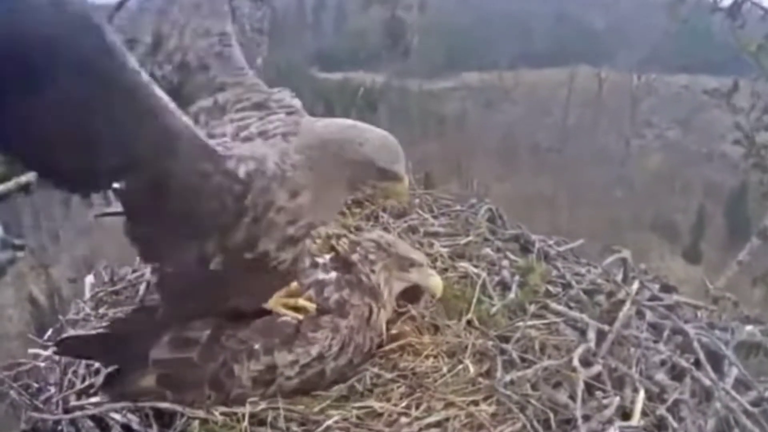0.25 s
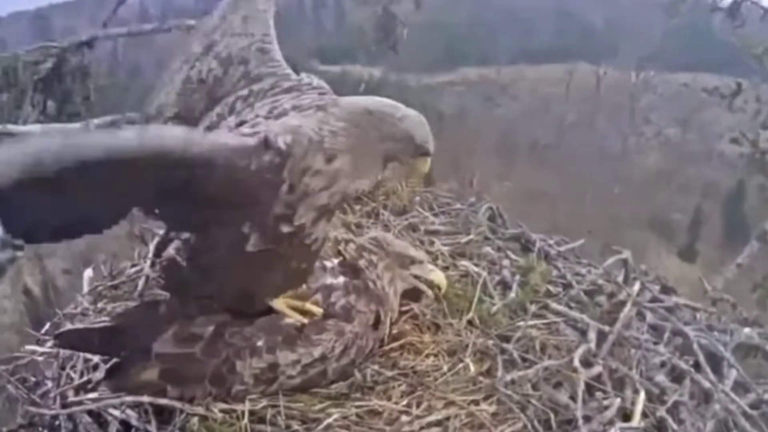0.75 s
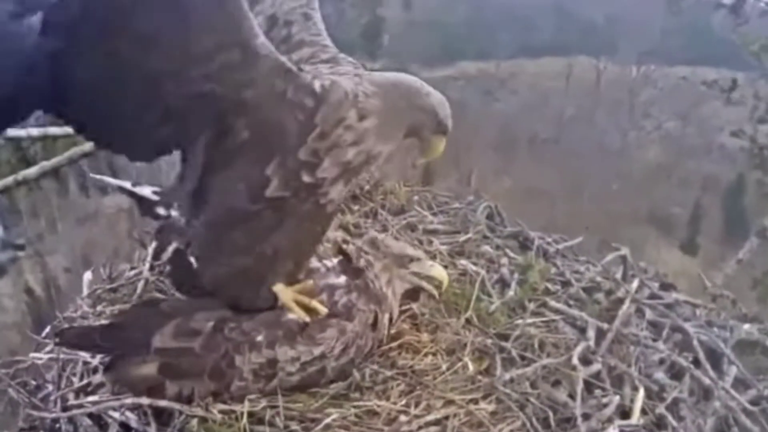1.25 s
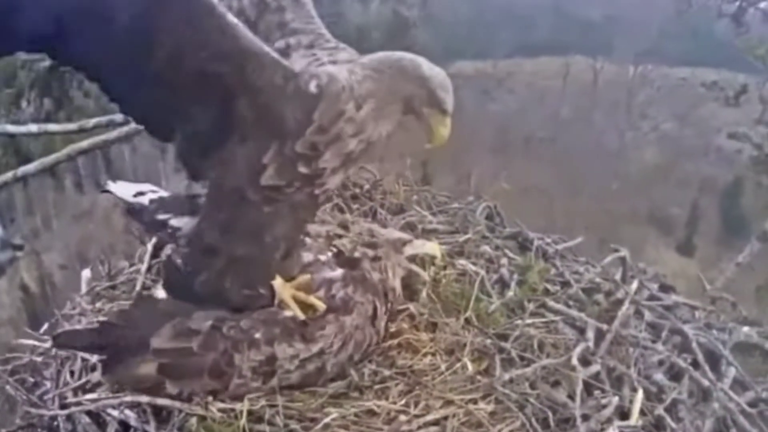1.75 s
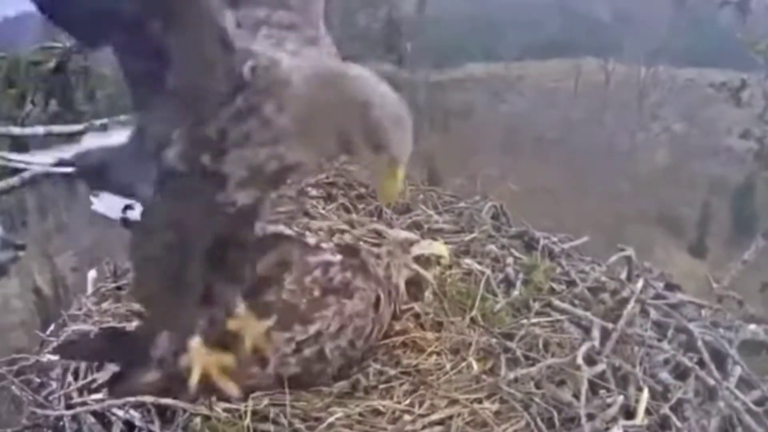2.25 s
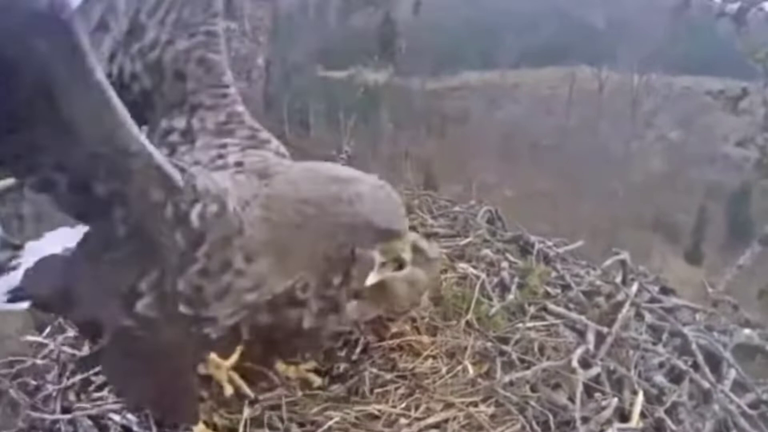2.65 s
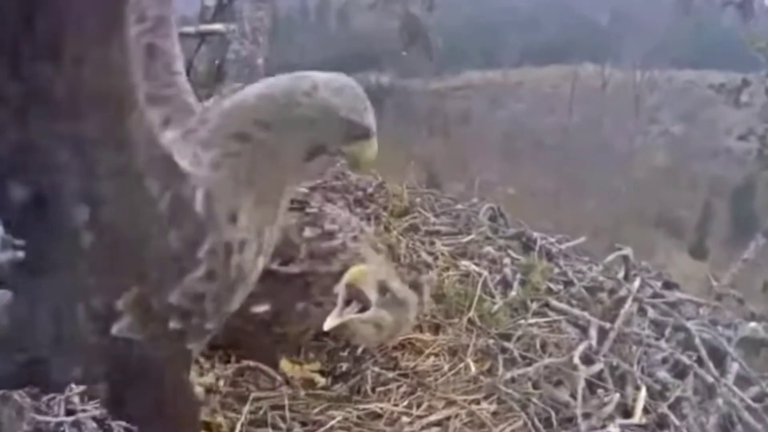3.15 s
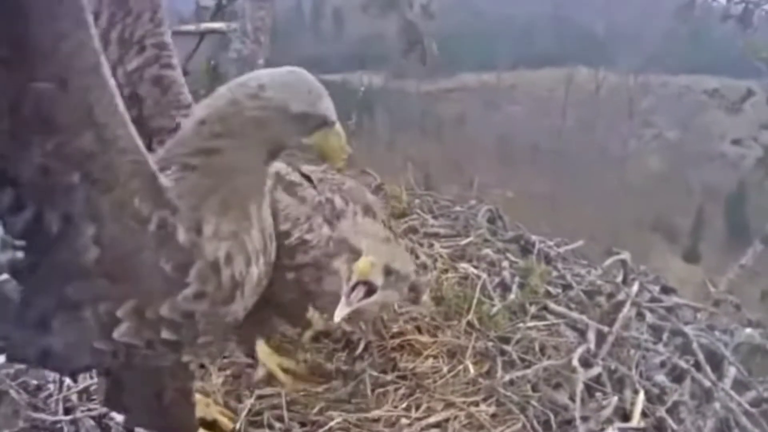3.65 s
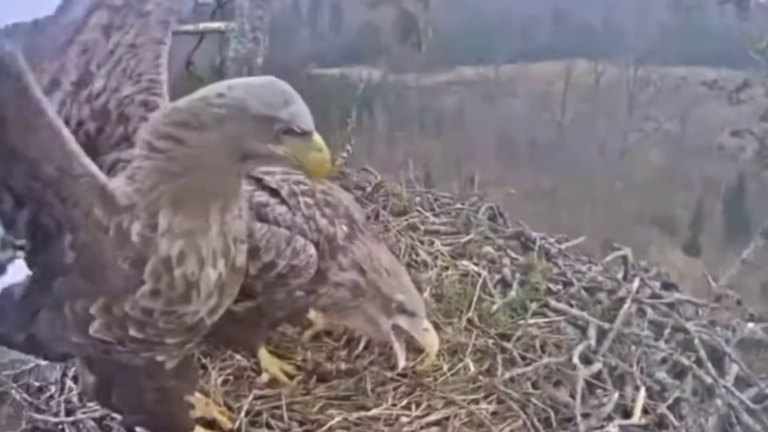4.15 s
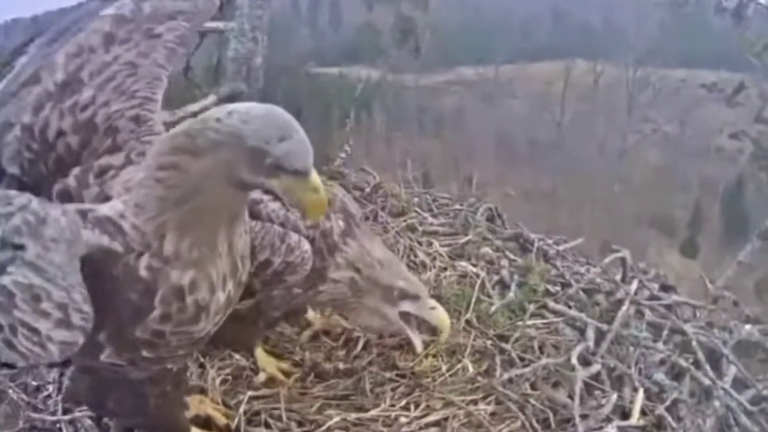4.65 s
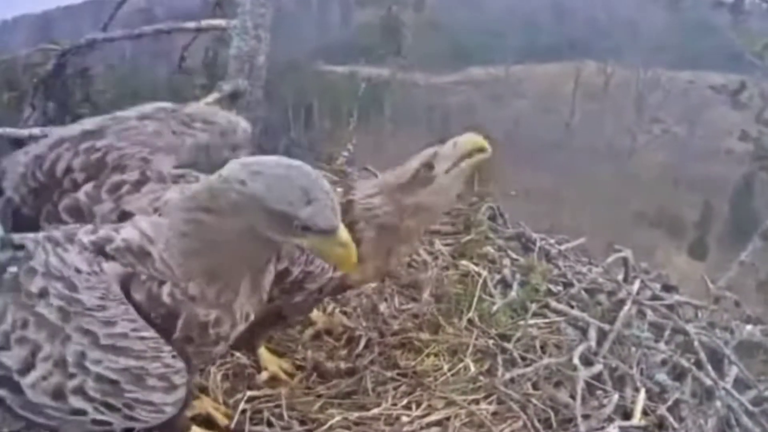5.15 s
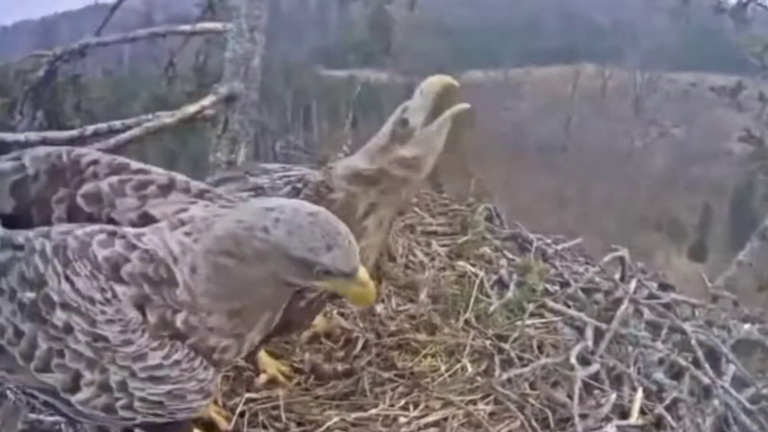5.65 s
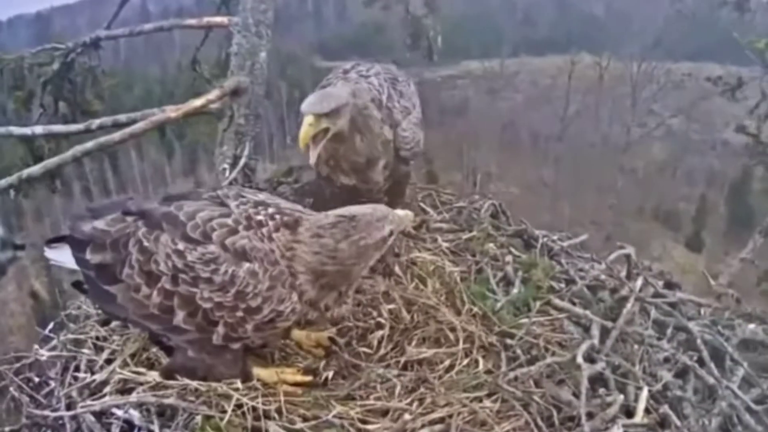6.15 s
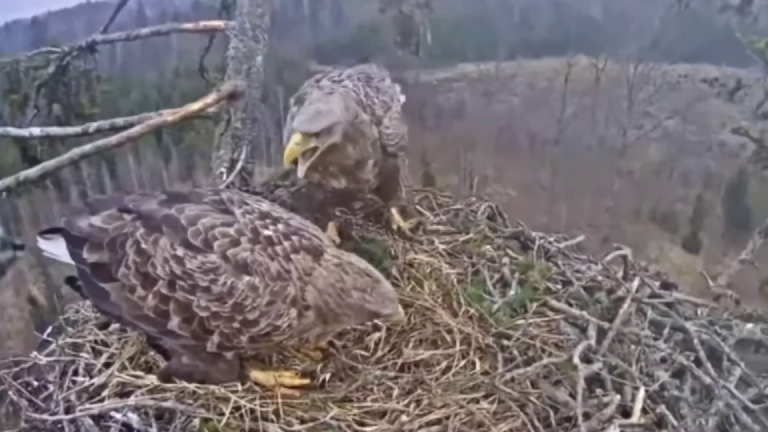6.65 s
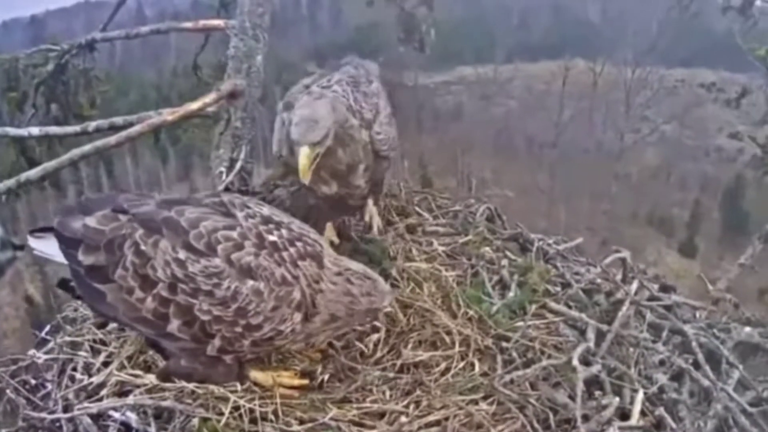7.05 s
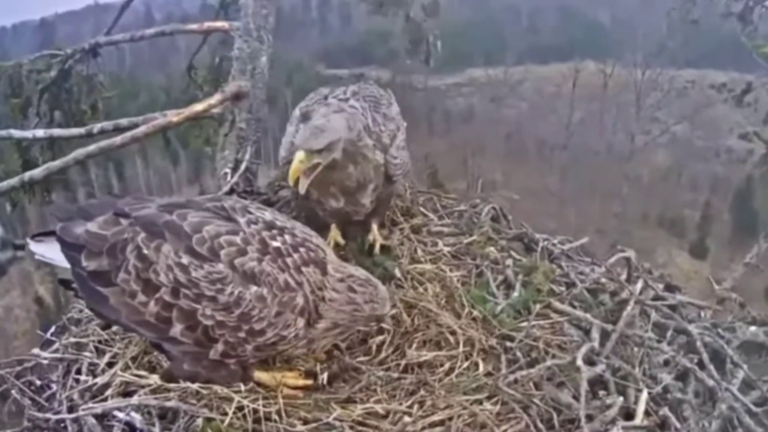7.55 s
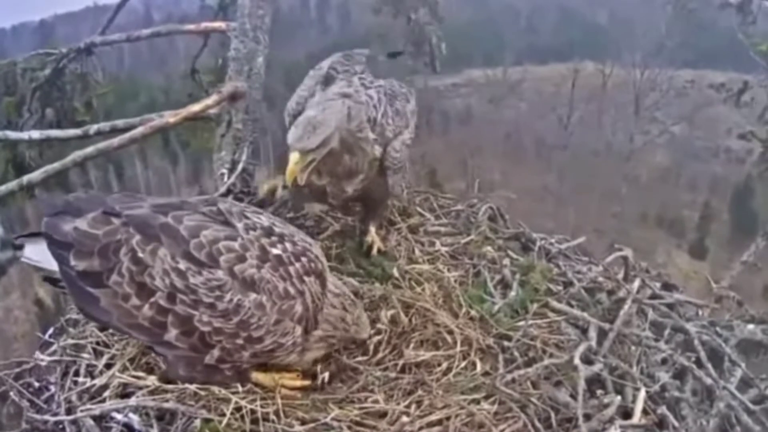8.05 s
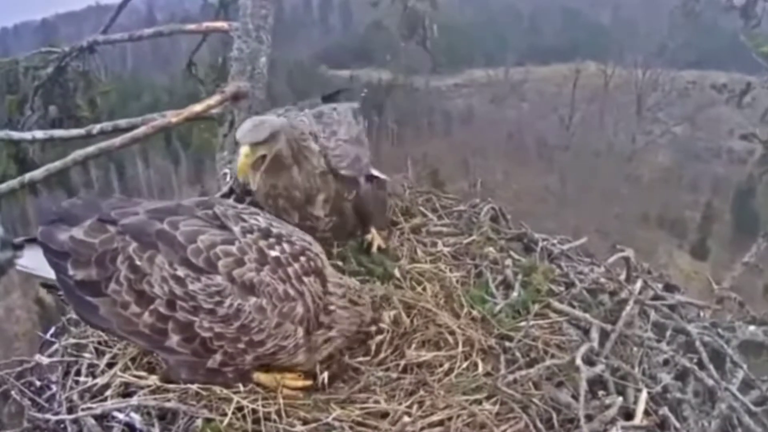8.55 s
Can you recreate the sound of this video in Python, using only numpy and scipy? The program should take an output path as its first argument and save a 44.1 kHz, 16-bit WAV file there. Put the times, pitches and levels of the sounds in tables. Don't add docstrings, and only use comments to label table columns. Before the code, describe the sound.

An eagle calls close to a microphone in an open treetop nest, with uneven low wind rumble throughout, strongest at the very start, and a faint forest hiss. A twig crackles at 0 s. From 0.7 to 2.7 s come soft, shaky whistles, some brief, some bulging or climbing. At 2.9 and 3.7 s whistles break into a higher voice; louder shouts follow at 4.1, with a twig snap, and 4.4. A short bark at 4.7 and a loud hoarse croak at 5.0 lead to raspy air, thin squeaks, clucks, settling sticks and a wing swish around 5.2-5.8. Sharp cries at 5.9 and 6.2 begin a regular run of loud, rising, cracking yelps from 6.5 to 8.7, about 0.3 s apart, with ragged tails and a slight outdoor echo. Feathers swish near 7.4; twigs snap at 8.1 and 8.4.

```python
import sys
import numpy as np
from scipy import signal
from scipy.fft import rfft, irfft, next_fast_len
from scipy.io import wavfile
from scipy.ndimage import uniform_filter1d, minimum_filter1d

SR = 44100
rng = np.random.default_rng(int(sys.argv[2]) if len(sys.argv) > 2 else 0)


def dump_mix(stems):
    frames = np.atleast_2d(stems).T
    limited = np.clip(frames, -1, 1)
    pcm = np.round(limited * 32767).astype(np.int16)
    wavfile.write(sys.argv[1], SR, pcm)


def linear_from_db(decibels):
    return 10 ** (np.asarray(decibels, float) / 20)


N = 387198
TIME = np.arange(N) / SR
SHORT_STEPS, STRIDE = 400, 16

# start_s, level_db, decay_s
SNAPS = [
    (0, -59, 0.0058),
    (.981, -60, 0.0018),
    (3.499, -72, 0.0027),
    (4.124, -46, 0.0066),
    (8.121, -49, 0.0021),
    (8.387, -54, 0.0015),
]
# peak_s, rumble_db, rise_s per 20 dB, fall_s per 20 dB, flutter_over_rumble_db
GUSTS = [(0.05, -29, .15, .12, -3), (.33, -43, .3, .4, -4), (0.66, -42, .2, .4, -11),
         (1.42, -35, .5, .4, -11), (2.0, -41, .5, .8, -7), (2.45, -48, .4, .6, -8), (3.05, -51, .5, .5, -6),
         (3.49, -46, .1, .1, -11), (3.78, -58, .15, .3, -6), (4.08, -49, .15, .3, -5),
         (4.5, -53, .2, .12, -15), (4.76, -41, .04, .5, -5), (4.99, -36, .4, .13, -9),
         (5.6, -46, .4, .2, -12), (5.82, -36, .06, .8, -3), (6.1, -37, .3, .8, -4), (6.6, -44, .5, .5, -5),
         (5.42, -56, .05, .15, 3), (6.95, -48, .3, .12, -5), (7.57, -43, .25, .12, -11),
         (7.85, -47, .3, .3, -8), (8.3, -48, .3, .4, -10), (8.62, -44, .4, .4, -4)]
CALM_DB = -60
# time_s, level_db
FOREST_LEVEL = [(0.0, -67.5), (0.8, -68.5), (1.0, -70), (2.47, -70.5), (2.9, -74.5), (3.5, -72.5),
                (5.26, -73.5), (5.72, -58), (7.06, -72.5), (7.43, -66.5), (7.61, -77), (8.78, -75)]
# pitch_hz, level_db
FOREST_COLOUR = [(350, -2.5), (650, -7.5), (800, 8), (1300, 0), (1700, 6), (2500, -1), (3600, -12.5),
                 (4800, -20), (6500, -42)]
HISS_DB = -86.5

# pitch_hz, level_db
THROAT = [(3000, 0), (3800, -6), (4600, -21), (5500, -32), (7000, -37), (9000, -52)]
# pitch_hz, level_db
SHRILL = [(4000, -27), (5700, -10.5), (6800, -6), (8000, -14), (10000, -23), (13500, -23.5), (15000, -39)]
# pitch_hz, level_db
MOUTH = [(800, 0.5), (1450, 0.5), (1850, 3.5), (2100, 12), (2500, 11), (2820, -10), (3500, -8), (4400, -20)]
RAISED_S, GAPE = 5.8, 1.09
WAVER_DB = 2.0
SHRILL_BELOW_HZ = 1400

# time_s, pitch_hz
WANDER = [
    [(0.738, 900), (0.771, 965), (0.789, 885), (0.804, 955), (0.84, 950), (0.865, 900), (0.96, 910)],
    [(1.598, 900), (1.64, 905), (1.70, 962), (1.745, 935), (1.785, 960), (1.82, 950)],
    [(2.002, 920), (2.08, 928), (2.128, 984), (2.17, 950), (2.22, 980), (2.248, 975)],
    [(2.418, 950), (2.53, 990), (2.575, 1030), (2.61, 1120), (2.65, 1160), (2.7, 1160)],
    [(2.905, 1035), (3.094, 1035), (3.133, 1094), (3.166, 1071), (3.241, 1130)],
]
WANDER_DB = [-53, -53, -53, -53, -52.5]
# start_s, length_s, taut_pitch_hz, last_pitch_hz, level_db
ARCHES = [
    (1.144, 0.14, 895, 938, -54.5),
    (1.326, 0.082, 955, 995, -51),
]
# start_s, length_s, taut_pitch_hz, last_pitch_hz, level_db
SHOUTS = [
    (4.108, 0.159, 1150, 1210, -48),
    (4.419, 0.099, 1230, 1260, -47),
]
# start_s, length_s, taut_pitch_hz, last_pitch_hz, level_db
CLIMBS = [
    (3.672, 0.195, 1126, 1158, -47),
]
# start_s, length_s, taut_pitch_hz, last_pitch_hz, level_db
BARKS = [
    (4.712, 0.0402, 1148, 1152, -48.5),
]
# start_s, length_s, taut_pitch_hz, last_pitch_hz, level_db
UPPERS = [
    (3.242, 0.226, 1448, 1478, -49.5),
    (3.866, 0.066, 1488, 1488, -46),
    (4.75, 0.018, 1335, 1317, -44),
]
# start_s, length_s, taut_pitch_hz, last_pitch_hz, level_db
CROAKS = [
    (5.008, 0.022, 1250, 1250, -27),
]
# start_s, length_s, taut_pitch_hz, last_pitch_hz, level_db
CRIES = [
    (5.88, 0.062, 1330, 1320, -36.5),
    (6.182, 0.06, 1390, 1420, -39.5),
]
# start_s, length_s, level_db
DOUBLING = [(0.82, 0.14, -70), (1.165, 0.115, -67.5), (2.425, 0.09, -66), (2.5, 0.2, -75), (2.93, .2, -79),
            (3.345, 0.06, -82), (4.694, 0.036, -54.5)]
# peak_s, shrill_db, rise_s per 20 dB, fall_s per 20 dB
STRAIN = [
    (3.715, -31, .022, .16),
    (4.143, -40, 0.0036, .019),
    (4.476, -68, 0.039, .027),
    (4.754, -36, .013, 0.012),
    (5.018, -41, .01, 0.0045),
]

# slack start hz, tighten s, slack end hz, let go s
ARCH, SHOUT, CLIMB = (820, .012, 830, .01), (900, .018, 800, .022), (900, .015, 1180, .002)
UPPER, CRY = (1440, .002, 1320, .012), (1140, .017, 1230, .013)
# second and third harmonic over the mouth's colour db; loss of first, second, third when slack db
SOFT, STRONG, FALSETTO = (-2.5, -4, 8, 20, 34), (2, -4, 10, 3, 24), (-1, 2, 10, 12, 12)
YELPED, HOARSE, OPEN = (-5, -3, 12, 10, 14), (-25, -35, 25, 5, 5), (-1, 9, 10, -2, 26)
PUSHED = (-4, 1.5, 7, 5, 25)

# start_s, length_s, level_db
RASPS = [(2.89, 0.017, -59), (3.66, 0.038, -58), (4.101, 0.027, -49.5), (4.709, 0.032, -41.5),
         (4.78, 0.02, -52), (5, 0.028, -38.5), (5.042, 0.03, -53.5), (5.068, 0.031, -47),
         (5.264, 0.025, -45.5), (5.367, 0.015, -46), (5.657, 0.023, -54.5), (5.387, 0.0447, -52),
         (7.89, 0.02, -61)]
# pitch_hz, level_db
RASP_COLOUR = [(800, -13), (1250, 2.5), (1900, 1), (2500, -2), (3500, -16), (4500, -28.5)]

# start_s, length_s, pitch_hz, level_db
DROPS = [
    (3.464, 0.013, 975, -56.5),
    (3.929, 0.013, 1070, -52),
]
DROP_HZ, DROP_SECOND_DB = 785, 15.5
# start_s, rise_length_s, length_after_break_s, level_db
YELPS = [(6.466, .035, 0.024, -32.5), (6.741, 0.029, .034, -31), (7.02, 0.023, .041, -31),
         (7.281, .03, 0.038, -30.5), (7.542, .025, .019, -31.5), (7.82, .017, 0.026, -29.5),
         (8.114, .018, 0.0377, -31), (8.386, .025, 0.033, -32), (8.642, 0.019, 0.038, -33)]
# start hz, end hz, first and second harmonic over the yelp's level db
RISE, BREAK = (1199.5, 1470.5, -9.5, -2), (1759.5, 1659.5, 0.5, -9.5)
BREAK_GAP_S = .001
# start_s, length_s, pitch_hz, first_harmonic_db, second_harmonic_db
SCRAPS = [(4.767, .0086, 1840, -39, -61), (4.782, .011, 1410, -49.5, -76), (5.264, .013, 1302, -38, -56),
          (5.659, .017, 1274, -39, -45), (6.526, 0.013, 1276, -48, -47), (6.803, 0.018, 1326, -49, -47),
          (7.089, 0.01, 1317, -46.5, -43), (7.35, 0.0072, 1235, -52, -50.5),
          (7.585, 0.0083, 1687, -42.5, -57), (7.863, 0.016, 1330, -55, -55.5),
          (8.166, 0.0058, 1640, -38, -51), (8.177, .014, 1604, -49.5, -66), (8.451, .011, 1313, -50, -47.5),
          (8.688, .0033, 1740, -40, -54), (8.704, 0.01, 1740, -46, -71)]
SCRAP_SAG = .03
# start_s, length_s, pitch_hz, level_db
SQUEAKS = [
    (5.287, .014, 4600, -66),
    (5.347, .012, 5150, -68),
]
SQUEAK_RISE = 1.12
# start_s, level_db, pitch_hz
CLUCKS = [
    (5.358, -40, 1680),
    (5.3689, -38.5, 1950),
    (5.699, -40.5, 1500),
    (5.7234, -40.5, 2060),
    (5.7468, -40, 1580),
    (5.7711, -44, 1620),
]

VALLEY_T60_S, BOWED_DB, RAISED_DB = 1.4, -44, -40
TRUNK_T60_S, TRUNK_DB = 0.072, -18.5

# peak_s, level_db, rise_s per 20 dB, fall_s per 20 dB
TRAMPLE = [
    (5.402, -58, 0.079, 2.4),
    (5.2, -66, 0.068, .4),
]
# peak_s, level_db, rise_s per 20 dB, fall_s per 20 dB
LANDINGS = [
    (5.5, -76, 0.85, .03),
    (5.52, -66, .03, .45),
]
# peak_s, level_db, rise_s per 20 dB, fall_s per 20 dB
SHAKES = [
    (7.352, -62, .005, .12),
    (7.4, -61, .06, .12),
    (7.966, -80, .08, 0.35),
]
# pitch_hz, level_db
LANDING_COLOUR = [(1500, 5.5), (2500, 7), (3600, 7), (5000, 3), (8000, -9.5), (9500, -22), (15000, -19.5)]
# pitch_hz, level_db
SHAKE_COLOUR = [(2000, -1), (3800, -1.5), (7200, 1), (11000, -14.5), (15000, -29)]
LIMIT = .062


def curve(table):
    s, *columns = np.transpose(table)
    return [np.interp(TIME, s, c) for c in columns]


def colour(points, hz):
    table_hz, db = np.array(points).T
    return np.interp(np.log(hz), np.log(table_hz), db)


def unit(x):
    return x / np.sqrt(np.mean(x ** 2))


def band(x, lo_hz, hi_hz, order=2):
    return signal.sosfilt(signal.butter(order, [lo_hz, hi_hz], "bandpass", fs=SR, output="sos"), x)


def walk(rate, size=N):
    k = int(SR / rate)
    count = size // k + 1
    steps = rng.standard_normal(max(count, SHORT_STEPS))[:count]
    smooth = uniform_filter1d(uniform_filter1d(np.repeat(steps, k), k), k)
    return 1.175 * smooth[:size]


def patchy(points, flicker_db, rate):
    size = next_fast_len(N)
    hz = np.arange(1, size // 2 + 2) * SR / size
    noise = rfft(rng.standard_normal(size)) * linear_from_db(colour(points, hz))
    coarse = TIME[::STRIDE]
    out = 0
    for centre in np.arange(np.log2(points[0][0]), np.log2(points[-1][0]), 1 / 3):
        window = np.cos(np.pi / 2 * np.clip(3 * (np.log2(hz) - centre), -1, 1)) ** 2
        flicker = linear_from_db(flicker_db * walk(rate * STRIDE, size=len(coarse)))
        out = out + np.interp(TIME, coarse, flicker) * irfft(noise * window, size)[:N]
    return out


def add(out, start_s, sound):
    i = int(start_s * SR)
    out[i:i + len(sound)] += sound[:N - i]


def hump(length_s, edge_s):
    t = np.arange(0, length_s, 1 / SR)
    to_edge = np.minimum(t, length_s - t)
    return np.sin(np.pi / 2 * np.clip(to_edge / edge_s, 0, 1)) ** 2


def swell(table):
    t = TIME[::STRIDE]
    total = sum(linear_from_db(db - 20 * np.maximum((s - t) / rise_s, (t - s) / fall_s))
                for s, db, rise_s, fall_s in table)
    return np.interp(TIME, t, total)


def snaps():
    out, t = np.zeros(N), np.arange(0, .07, 1 / SR)
    for s, db, decay_s in SNAPS:
        add(out, s, linear_from_db(db) * rng.standard_normal(len(t)) * np.exp(-t / decay_s))
    return band(out, 3000, 14000, order=3)


def wind():
    lumps, puffs = walk(22), walk(6)
    rumble_gain = linear_from_db(2.68 * lumps + 1.1 * walk(15) + 1.4 * puffs)
    flutter_gain = linear_from_db(3.6 * lumps + 1.6 * walk(35) + 1.4 * puffs)
    fringe_gain = linear_from_db(2.5 * lumps + 2.0 * walk(55))
    rumble = unit(band(rng.standard_normal(N), 26.3, 89.5) * rumble_gain)
    flutter = unit(band(rng.standard_normal(N), 135.3, 235.7) * flutter_gain)
    fringe = unit(band(rng.standard_normal(N), 170, 270) * fringe_gain)
    low_gusts = [(s, db, rise_s, fall_s) for s, db, rise_s, fall_s, _ in GUSTS]
    high_gusts = [(s, db + over_db, rise_s, fall_s) for s, db, rise_s, fall_s, over_db in GUSTS]
    low = linear_from_db(CALM_DB) + swell(low_gusts)
    high = linear_from_db(CALM_DB - 5) + swell(high_gusts)
    return low * rumble + high * (flutter + linear_from_db(-23.0) * fringe)


def forest():
    hiss = patchy(FOREST_COLOUR, flicker_db=-2.0, rate=4)
    return hiss / np.std(band(hiss, 600, 2100)) * linear_from_db(curve(FOREST_LEVEL)[0] + 2.5)


def electronics():
    return linear_from_db(HISS_DB) * band(rng.standard_normal(N), 300, 15000)


def syrinx(hz, first_db, second_db, third_db, half_db, shrill_db, rough):
    n = len(hz)
    waver = 0.0043 * walk(35, size=n) + 0.0064 * walk(120, size=n) + 0.1 * rough * walk(500, size=n)
    phase = 2 * np.pi * np.cumsum(hz * (1 + waver)) / SR
    y = linear_from_db(first_db) * np.sin(phase)
    y += linear_from_db(second_db + 1.2 * walk(50, size=n)) * np.sin(2 * phase + 1)
    for k in range(3, 15):
        throat_db = colour(THROAT, k * hz) - colour(THROAT, 3 * hz)
        soft = linear_from_db(third_db + throat_db + 3.5 * walk(35, size=n))
        top = linear_from_db(shrill_db + colour(SHRILL, k * hz) + 3.2 * walk(41, size=n))
        blur = 1 + (3 * rough + k / 70) * walk(900, size=n)
        y += (soft + top) * blur * (k * hz < 14800) * np.sin(k * phase + k * k)
    for k, db in [(.5, -17), (1.5, 7.5), (2.5, 6), (3.5, -13.5), (4.5, -25.0)]:
        y += linear_from_db(half_db + db + 4.5 * walk(60, size=n)) * np.sin(k * phase)
    return np.sqrt(2) * y * (1 + rough * walk(900, size=n))


def long_calls():
    kinds = [(ARCHES, ARCH, SOFT), (SHOUTS, SHOUT, OPEN), (CLIMBS, CLIMB, STRONG), (BARKS, CLIMB, OPEN),
             (UPPERS, UPPER, FALSETTO), (CRIES, CRY, YELPED), (CROAKS, UPPER, HOARSE)]
    calls = []
    for table, tension, tone in kinds:
        for s, length, from_hz, to_hz, db in table:
            calls.append(([(s, from_hz), (s + length, to_hz)], db, tension, tone))
    calls += zip(WANDER, WANDER_DB, [ARCH, ARCH, ARCH, SHOUT, CLIMB], [SOFT, SOFT, SOFT, PUSHED, STRONG])
    return calls


def whistles():
    out, half, shrill = np.zeros(N), np.zeros(N), swell(STRAIN)
    for s, length, db in DOUBLING:
        add(half, s, linear_from_db(db) * hump(length, edge_s=0.025))
    for taut, db, tension, tone in long_calls():
        start_hz, tighten_s, end_hz, let_go_s = tension
        second_db, third_db, *losses = tone
        s, taut_hz = np.array(taut).T
        gain = hump(s[-1] - s[0], edge_s=.005)
        i = int(s[0] * SR) + np.arange(len(gain))
        since_start, since_end = TIME[i] - s[0], TIME[i] - s[-1]
        rough = .04 + .3 * np.exp(-since_start / .012) + .25 * np.exp(since_end / .008)
        loose, tired = np.exp(-since_start / tighten_s), np.exp(since_end / let_go_s)
        hz = uniform_filter1d(np.interp(TIME[i], s, taut_hz), size=300)
        hz = hz + (start_hz - hz) * loose + (end_hz - hz) * tired
        gape = GAPE if s[0] > RAISED_S else 1
        levels = []
        for k, over_db, loss in zip([1, 2, 3], [0, second_db, third_db], losses):
            mouth_db = colour(MOUTH, k * hz / gape)
            slack_db = loss * (loose + tired)
            levels.append(db + over_db + mouth_db - slack_db + WAVER_DB * walk(25, size=len(i)))
        top = shrill[i] * (taut_hz[0] < SHRILL_BELOW_HZ)
        half_db, shrill_db = 20 * np.log10(half[i] + 1e-7), 20 * np.log10(top + 1e-7)
        add(out, s[0], gain * syrinx(hz, *levels, half_db, shrill_db, rough))
    return out


def scatter(x, t60_s, build_s, top_hz):
    t = np.arange(0, t60_s, 1 / SR)
    fade = np.exp(-np.log(1000) * t / t60_s) * (1 - np.exp(-t / build_s))
    tail = band(rng.standard_normal(len(t)), 700, top_hz, order=3) * fade
    return signal.fftconvolve(x, tail / np.sqrt(np.sum(tail ** 2)))[:N]


def valley(voice):
    aim = linear_from_db(np.where(TIME < RAISED_S, BOWED_DB, RAISED_DB))
    far = scatter(voice * aim, VALLEY_T60_S, build_s=0.016, top_hz=3890)
    near = scatter(voice, TRUNK_T60_S, build_s=0.0026, top_hz=11800)
    return far + linear_from_db(TRUNK_DB) * near


def rasps():
    gain = np.zeros(N)
    for s, length, db in RASPS:
        add(gain, s, linear_from_db(db) * hump(length, edge_s=.007))
    return gain * unit(patchy(RASP_COLOUR, flicker_db=2.5, rate=120) * linear_from_db(2.5 * walk(250)))


def notes(table, edge_s, first_fall_db, second_fall_db, third_db, shrill_db, rough):
    out = np.zeros(N)
    for s, length, start_hz, end_hz, first_db, second_db in table:
        gain = hump(length + edge_s, edge_s)
        u = np.linspace(0, 1, len(gain))
        first = first_db - first_fall_db * u ** 2
        second = second_db - second_fall_db * u ** 2
        hz = start_hz + (end_hz - start_hz) * u
        sound = syrinx(hz, first, second, second + third_db, first - 45, second + shrill_db, rough)
        add(out, s - edge_s / 5, gain * sound)
    return out


def glide(shape, spans):
    start_hz, end_hz, first_db, second_db = shape
    return [(s, length, start_hz, end_hz, db + first_db, db + second_db) for s, length, db in spans]


def yelps():
    rising = glide(RISE, [(s, rise_s - BREAK_GAP_S, db) for s, rise_s, _, db in YELPS])
    broken = glide(BREAK, [(s + rise_s, break_s, db) for s, rise_s, break_s, db in YELPS])
    scraps = [(s, length, hz * (1 + SCRAP_SAG), hz * (1 - SCRAP_SAG), db, second_db)
              for s, length, hz, db, second_db in SCRAPS]
    scraps += [(s, length, hz, DROP_HZ, db, db + DROP_SECOND_DB) for s, length, hz, db in DROPS]
    scraps += [(s, length, hz, hz * SQUEAK_RISE, db, db - 40) for s, length, hz, db in SQUEAKS]
    rises = notes(rising, edge_s=.009, first_fall_db=3, second_fall_db=9,
                  third_db=-23, shrill_db=-50, rough=.16)
    breaks = notes(broken, edge_s=0.00396, first_fall_db=15.5, second_fall_db=33.5,
                   third_db=-27, shrill_db=-37, rough=0.14)
    afters = notes(scraps, edge_s=0.0087, first_fall_db=0, second_fall_db=14.5,
                   third_db=-27, shrill_db=-54.0, rough=0.41)
    return rises + breaks + afters


def trample():
    return unit(band(rng.standard_normal(N), 470, 870) * linear_from_db(2.5 * walk(60))) * swell(TRAMPLE)


def clucks():
    out, t = np.zeros(N), np.arange(0, .012, 1 / SR)
    pulse = 5.5 * (t / 0.00047) * np.exp(-t / 0.00051)
    for s, db, hz in CLUCKS:
        ring = np.sin(2 * np.pi * hz * t) + 0.16 * np.sin(2 * np.pi * 1.3 * hz * t)
        add(out, s, linear_from_db(db) * ring * pulse)
    return out


def wings():
    out = np.zeros(N)
    for table, points in [(LANDINGS, LANDING_COLOUR), (SHAKES, SHAKE_COLOUR)]:
        swish = patchy(points, flicker_db=-2.0, rate=30)
        out += swish / np.std(band(swish, 6000, 12000)) * swell(table)
    return out


def eagles():
    return whistles() + rasps() + yelps() + clucks()


def scene():
    nest = snaps() + trample() + wings()
    air = wind() + forest() + electronics()
    voice = eagles()
    return (voice + valley(voice) + nest + air)[None]


def band_limit(x):
    return signal.sosfilt(signal.butter(12, 15610, fs=SR, output="sos"), x)


def record(dry):
    room = np.minimum(LIMIT / (np.abs(dry) + 1e-9), 1)
    gain = uniform_filter1d(minimum_filter1d(room, size=600), size=500)
    return band_limit(dry * gain)


dry = scene()
out = record(dry)
dump_mix(out)
```